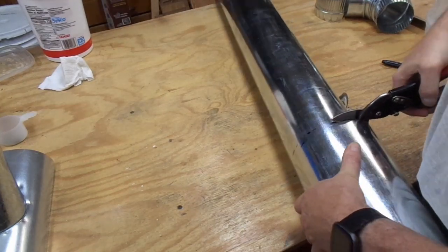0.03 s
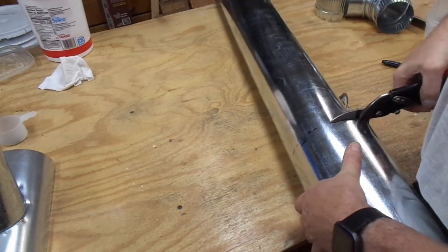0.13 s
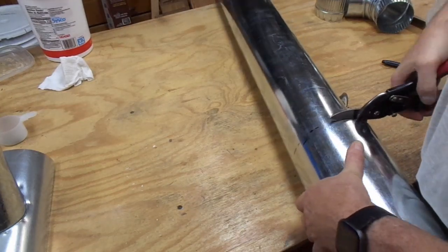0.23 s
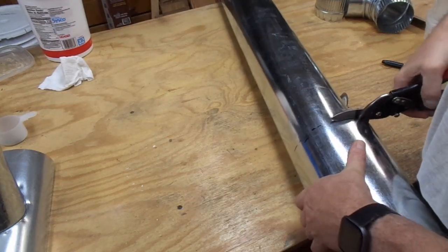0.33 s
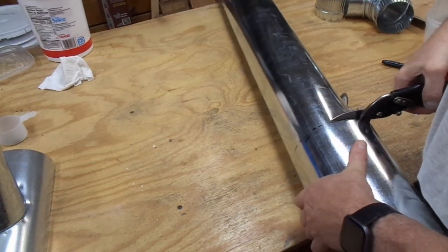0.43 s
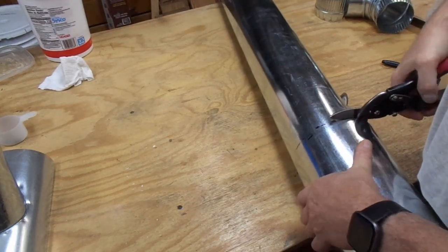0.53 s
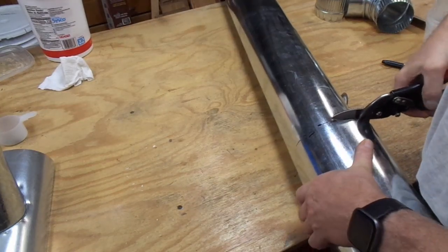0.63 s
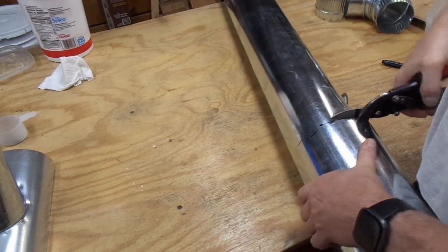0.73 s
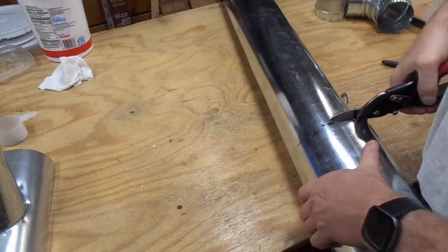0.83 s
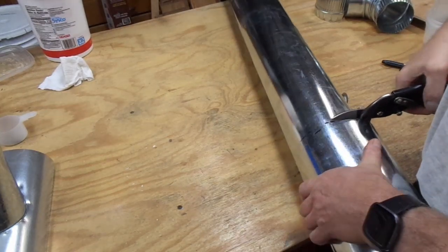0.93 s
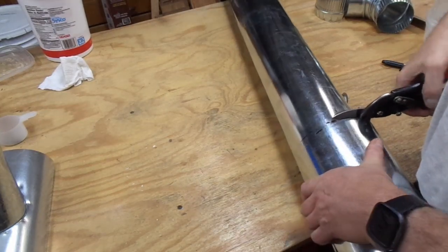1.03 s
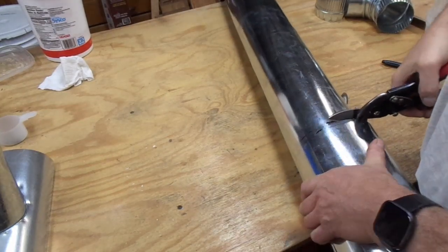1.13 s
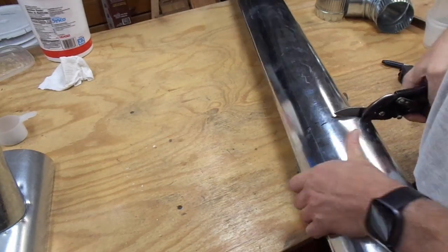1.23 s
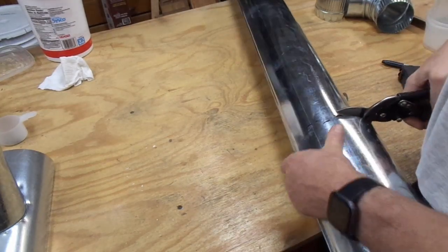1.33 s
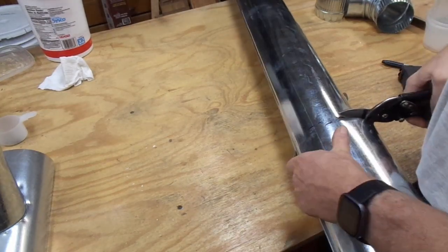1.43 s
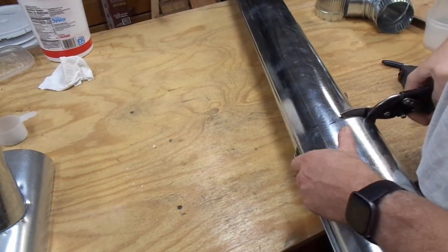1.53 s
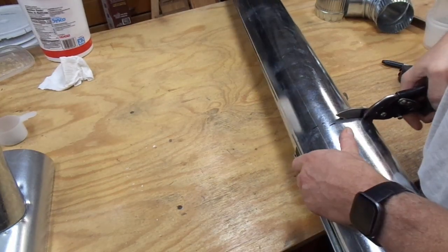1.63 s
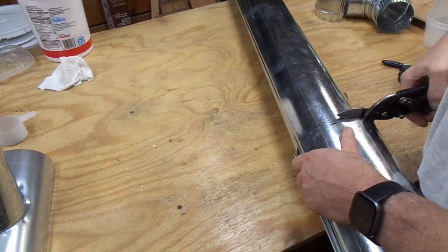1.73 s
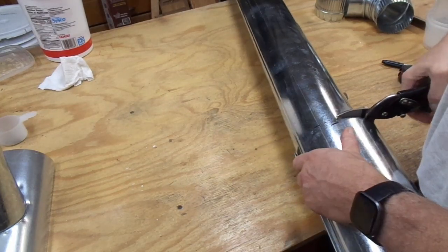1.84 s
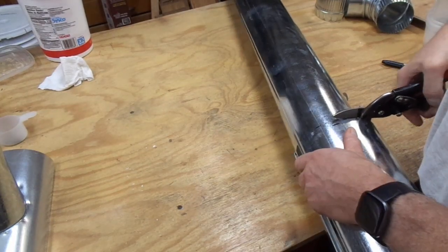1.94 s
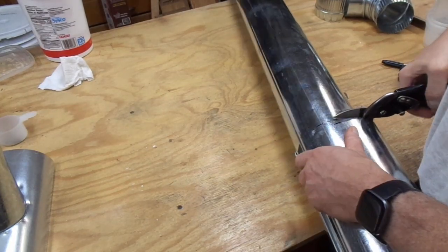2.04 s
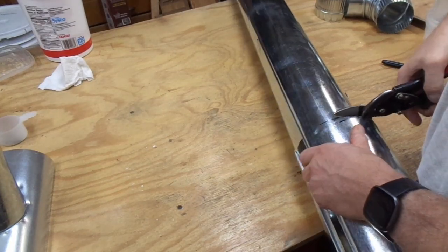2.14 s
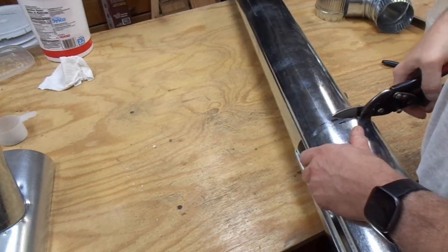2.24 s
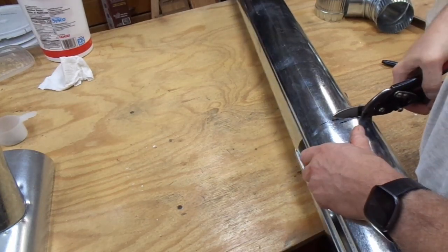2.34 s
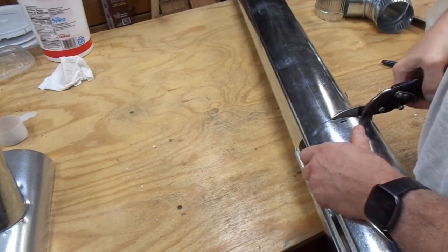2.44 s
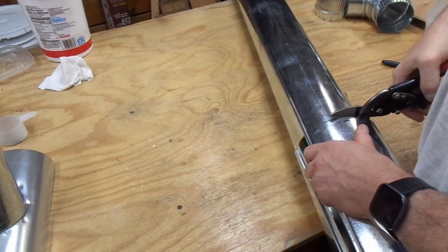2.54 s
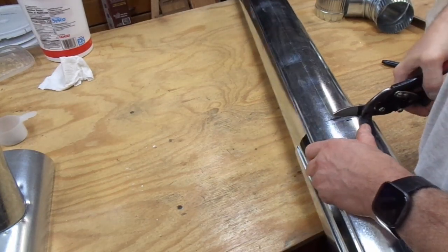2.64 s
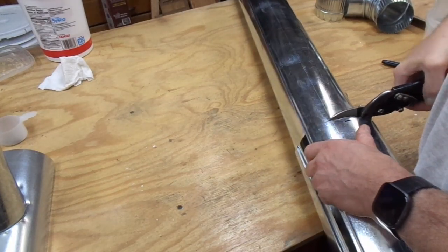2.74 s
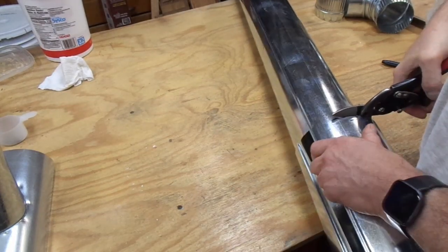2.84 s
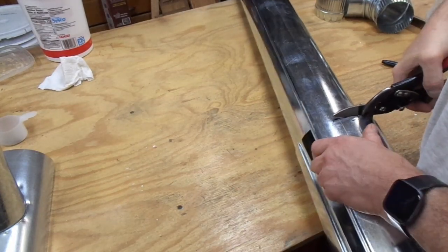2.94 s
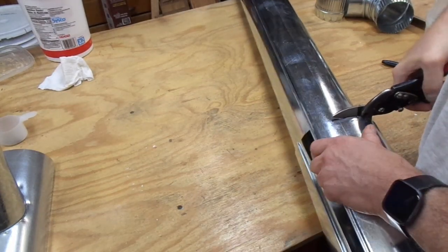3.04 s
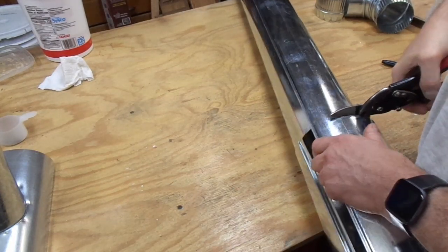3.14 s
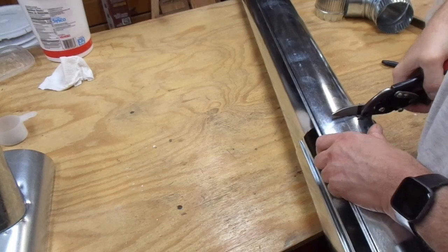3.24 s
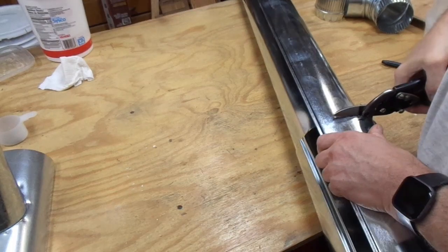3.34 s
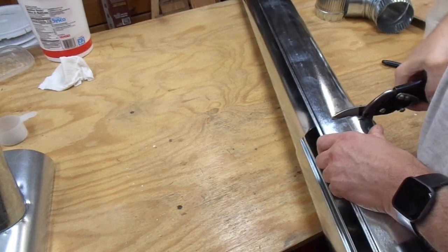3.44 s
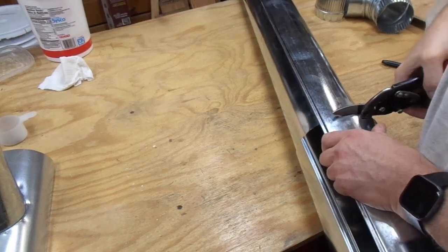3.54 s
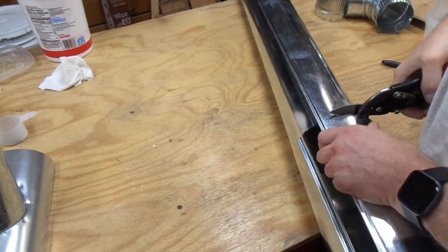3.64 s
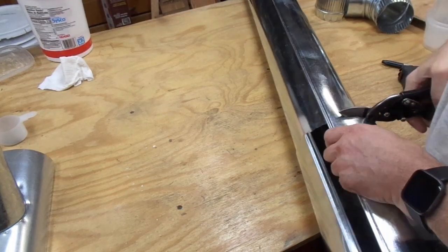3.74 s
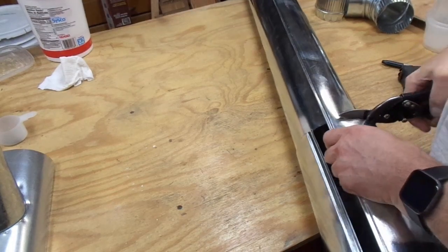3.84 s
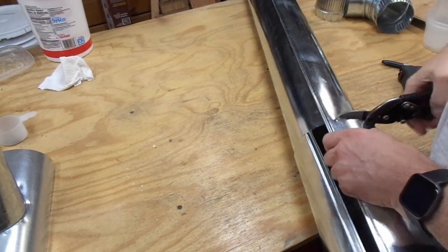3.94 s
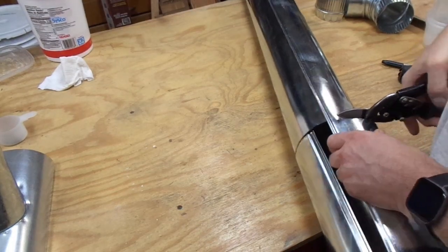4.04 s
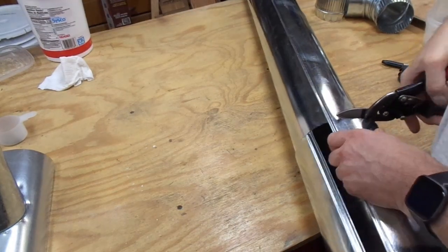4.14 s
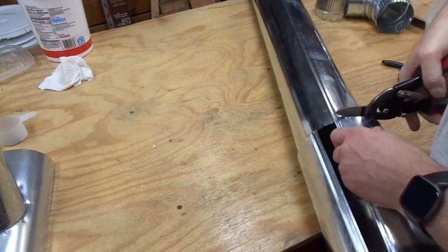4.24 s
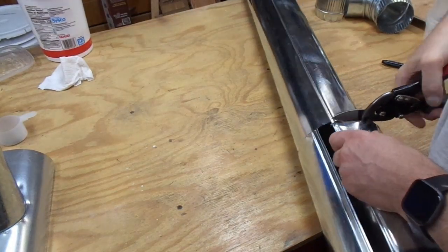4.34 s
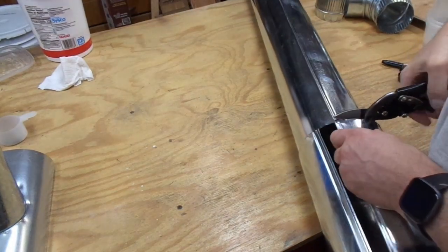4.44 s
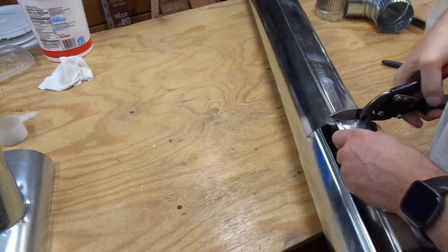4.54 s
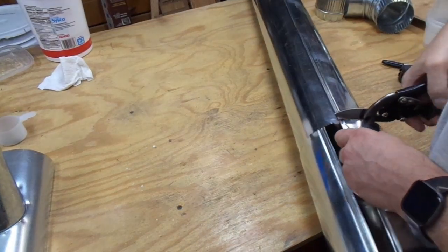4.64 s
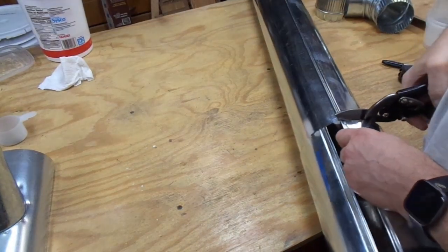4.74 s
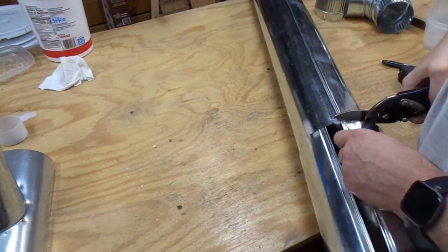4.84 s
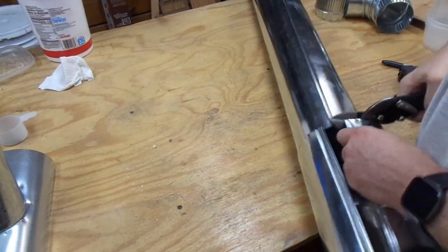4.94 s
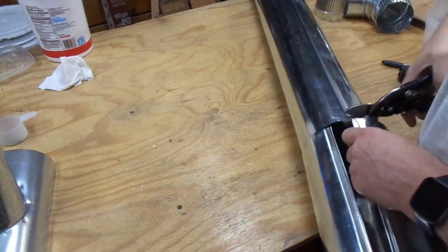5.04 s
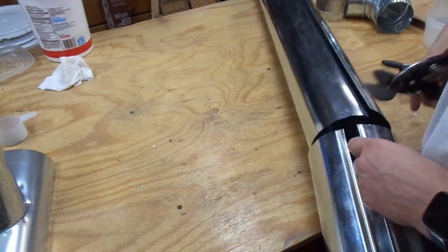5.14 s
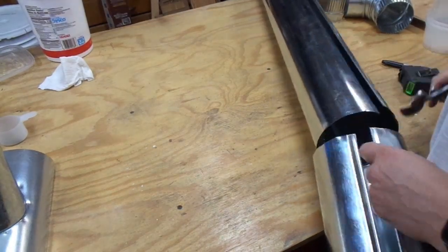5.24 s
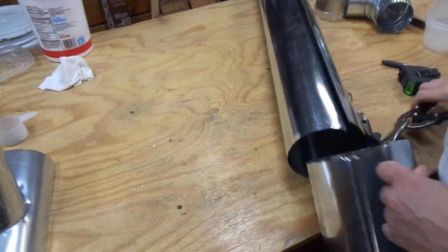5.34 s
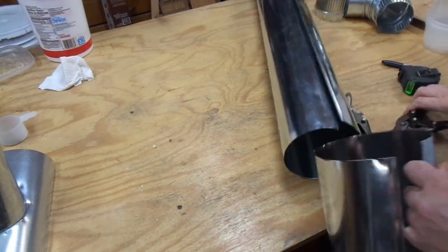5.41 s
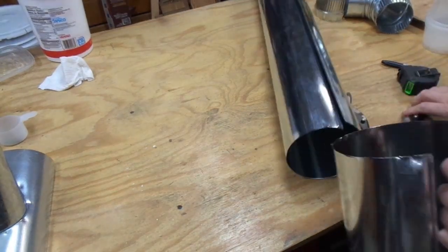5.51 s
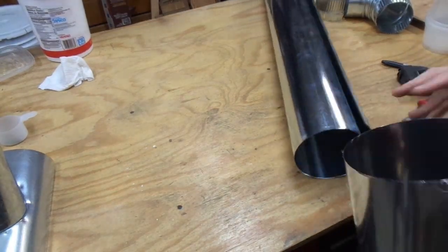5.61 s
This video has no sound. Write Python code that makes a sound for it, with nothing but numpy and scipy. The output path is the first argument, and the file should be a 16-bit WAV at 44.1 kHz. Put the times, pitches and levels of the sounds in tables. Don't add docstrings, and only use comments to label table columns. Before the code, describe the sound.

Close view of hand snips cutting a thin steel duct on a plywood bench. Crunchy bites and springy releases come in pairs, with blade rasp, small squeaks and soft thuds. Cuts grow louder after four seconds, then a distorted crack at five as the strip parts, followed by clanks and scraping of the freed piece. Small, fairly dry workshop with faint hiss.

```python
import sys
import numpy as np
from scipy import signal
from scipy.fft import rfft, irfft
from scipy.io import wavfile
from scipy.ndimage import uniform_filter1d

SR = 44100
rng = np.random.default_rng(int(sys.argv[2]) if len(sys.argv) > 2 else 0)


def voltage_ratio(decibels):
    exponent = np.asarray(decibels, float) / 20
    return 10 ** exponent


def wav_out(sig):
    wavfile.write(sys.argv[1], SR, np.round(np.clip(np.atleast_2d(sig).T, -1, 1) * 32767).astype(np.int16))


N = 250047
SPAN = 8192

# frequency in Hz, level in dB, T60 in s.
DUCT_AIR = [(277.5, -5, 0.17), (300, -8, 0.084)]
# frequency in Hz, level in dB, T60 in s.
WALL = [(375.4, 11, 0.19), (411.7, 10, 0.27), (449, 8, 0.18), (495, 7, 0.29), (615, -35.5, 0.14),
        (620, -0.5, 0.03), (662, 12.5, 0.2), (760, 4.5, 0.058), (824, -33, 0.13), (925, 7, 0.032),
        (975, -26, 0.18), (1080, -18, 0.3), (1160, 0.5, 0.026), (1214, 3, 0.15), (1383, -13, 0.69),
        (1520, -10, 0.21), (1594, 9.5, 0.028), (1670, -2.5, 0.28), (1810, 5, 0.043), (2000, -12, 0.068),
        (1890, -32, 0.089), (2184, -41.5, 0.04), (2533, -37.5, 0.04), (2600, -28, 0.054),
        (2740, 1.5, 0.076), (3090, -9, 0.26), (3370, -48.5, .1), (3420, -54, .12)]
# time in s, relative air level in dB.
AIR_SHARE = [(0, 2.5), (2.0, -4), (3.5, -8), (4.6, -4.5), (5.6, 6)]


def unit(x):
    return x / np.sqrt(np.mean(x ** 2) + 1e-20)


def band(x, low_hz, high_hz, order=2):
    sos = signal.butter(order, [low_hz, min(high_hz, .45 * SR)], "band", fs=SR, output="sos")
    return signal.sosfilt(sos, x)


def rings(modes):
    hz, db, t60 = np.transpose(modes)[:, :, None]
    t = np.arange(SPAN) / SR
    return voltage_ratio(db - 60 * t / t60) * np.sin(2 * np.pi * hz * t)


def sheet(low_hz, high_hz, t60, count=1):
    t = np.arange(SPAN) / SR
    decay = voltage_ratio(-60 * t / t60) + 2.6 * voltage_ratio(-60 * t / 0.0079)
    tail = band(rng.standard_normal((count, SPAN)), low_hz, high_hz) * decay
    return tail / np.sqrt(np.mean(tail ** 2, axis=1, keepdims=True))


def slips(times, spread_db):
    u = np.arange(SPAN // 2) / SR / times[:, None]
    sizes = voltage_ratio(spread_db * np.minimum(rng.exponential(1, u.shape), 6)) * rng.standard_normal(u.shape)
    clumps = voltage_ratio(1.5 * unit(band(rng.standard_normal(u.shape), 80, 400)))
    burst = sizes * clumps * np.exp(-(u - 3) ** 2 / 2)
    return burst / np.sqrt(np.sum(burst ** 2, axis=1, keepdims=True))


def add(out, s, burst, body, level_db):
    sound = signal.fftconvolve(burst, body)
    top = np.sqrt(np.max(uniform_filter1d(sound ** 2, size=440)) + 1e-20)
    piece = out[max(round(s * SR), 0):][:len(sound)]
    piece += voltage_ratio(level_db) / top * sound[:len(piece)]


def room_tone():
    # frequency in Hz, density in dB per Hz.
    tone_spectrum = [(35, -19), (65, -12.5), (100, -13.5), (170, -8.5), (280, -5.5), (700, -3), (1500, -9),
                     (3000, -14), (6000, -18.5), (12000, -18.5), (15300, -19.5)]
    hz, db = np.transpose(tone_spectrum)
    bins_hz = np.maximum(np.fft.rfftfreq(N, 1 / SR), 1)
    shape = voltage_ratio(np.interp(np.log(bins_hz), np.log(hz), db))
    return voltage_ratio(-53.5) * unit(irfft(rfft(rng.standard_normal(N)) * shape, N))


def workshop(x):
    echo_delay = np.zeros(round(0.012 * SR))
    tail = np.concatenate([echo_delay, sheet(120, 8500, 0.18)[0] / np.sqrt(SPAN)])
    return voltage_ratio(-24.5) * signal.fftconvolve(x, tail)[:N]


def hum():
    t = np.arange(N) / SR
    air_mode = rings([(DUCT_AIR[0][0], 0, 0.34)])[0]
    line = signal.fftconvolve(rng.standard_normal(N + SPAN), air_mode)[SPAN:SPAN + N]
    level_db = -59 + np.interp(t, *np.transpose(AIR_SHARE))
    return voltage_ratio(level_db) * unit(band(line, 220, 340))


def sliding():
    # time in s, low wall level in dB, upper wall level in dB.
    slide_levels = [
        (0.0, -86, -87),
        (1.61, -64, -56),
        (1.99, -62, -77),
        (2.54, -68, -81),
        (3.98, -56, -58),
        (4.06, -49.5, -72),
        (4.86, -60, -78),
        (5.2, -59, -53),
        (5.67, -71, -51),
    ]
    s, low_db, upper_db = np.transpose(slide_levels)
    t = np.arange(N) / SR
    lumps = voltage_ratio(5.8 * unit(band(rng.standard_normal(N), 10.5, 83)))
    rub = band(lumps * rng.standard_normal(N), 314, 6400, order=4)
    low_body = rings(WALL[:9]).sum(axis=0) + voltage_ratio(8.0) * rings(DUCT_AIR).sum(axis=0)
    upper_body = rings(WALL[9:]).sum(axis=0) + voltage_ratio(-9) * sheet(970, 4500, 0.12)[0]
    low = unit(signal.fftconvolve(rub, low_body)[:N])
    upper = unit(signal.fftconvolve(rub, upper_body)[:N])
    return voltage_ratio(np.interp(t, s, low_db)) * low + voltage_ratio(np.interp(t, s, upper_db)) * upper


def bench():
    # time in s, level in dB.
    thud_events = [(0.238, -58), (0.515, -76), (0.76, -73), (1.084, -62), (1.577, -60), (1.922, -78),
                   (2.145, -79), (2.493, -67), (2.825, -56), (3.167, -54), (3.502, -51), (4.042, -54),
                   (4.228, -54), (4.496, -54), (4.673, -58), (4.968, -48), (5.38, -42), (5.55, -46)]
    out = np.zeros(N)
    thud = rings([(100.7, -32, 0.26), (150, -24, 0.14)]).sum(axis=0)
    pushes = np.abs(slips(np.full(len(thud_events), .003), spread_db=2.5))
    for (s, level_db), push in zip(thud_events, pushes):
        add(out, s - .012, push, thud, level_db + 7.5)
    return signal.sosfilt(signal.butter(4, 68, "high", fs=SR, output="sos"), out)


def rumble(clanks):
    shake = np.sqrt(uniform_filter1d(clanks ** 2, size=660))
    return voltage_ratio(-33.5) * shake * unit(band(rng.standard_normal(N), 78, 118))


def pings():
    # time in s, level in dB, frequency in Hz, T60 in s.
    lone_pings = [
        (0.482, -54, 5360, .08),
        (0.003, -39.5, 328, 0.032),
        (3.163, -25.5, 540, 0.011),
        (3.865, -48.5, 4300, 0.017),
        (4.240, -39, 760, 0.091),
        (4.484, -38.5, 1933, 0.11),
        (4.609, -59, 4300, .04),
        (5.550, -20, 620, 0.015),
    ]
    out = np.zeros(N)
    bursts = slips(np.full(len(lone_pings), .0008), spread_db=-6.0)
    for (s, level_db, hz, t60), burst in zip(lone_pings, bursts):
        pair = [(hz, 0, t60), (1.06 * hz, -6, t60)]
        add(out, s, burst, rings(pair).sum(axis=0), level_db)
    return band(out, 300, 9000)


def blades(rasps):
    # frequency in Hz, level in dB, T60 in s.
    edge_modes = [(3447, 7, 0.1), (4710, 7, 0.054), (4770, 16, 0.029), (5800, 11, 0.06), (6520, -14, 0.028)]
    s, edge_db, hiss_db, time_s = np.transpose(rasps)
    time_s = np.clip(time_s, .0005, .014)
    edge, grip = rings(edge_modes), rng.normal(0, 6.9, (len(s), len(edge_modes)))
    middle = sheet(2320, 5530, 0.098, count=len(s))
    hiss = sheet(6200, 12400, 0.071, count=len(s))
    out = np.zeros(N)
    for k, burst in enumerate(slips(time_s, spread_db=3.0)):
        start = s[k] - 3.0 * time_s[k] - .0015
        edge_body = voltage_ratio(-8.5) * unit(voltage_ratio(grip[k]) @ edge) + middle[k]
        add(out, start, burst, edge_body, edge_db[k] - .3)
        add(out, start, burst, hiss[k], edge_db[k] + hiss_db[k] - .3)
    return out


def brightness(zone_hz):
    return -7 + 3.5 * np.log2(zone_hz / 700)


def strokes():
    # top in s, lower wall level in dB,
    # loudest wall zone in Hz, swell time in s, relative blade rasp in dB.
    crunches = [(.163, -37.5, 1120, 0.0058, -27), (.435, -38.5, 500, 0.0057, -15),
                (.714, -34.5, 1200, 0.013, -19.5), (.912, -42, 686, 0.0093, -14),
                (.98, -39.5, 1670, 0.0043, -19), (1.085, -35.5, 452, 0.0079, -17),
                (1.511, -35, 920, 0.016, -20), (1.838, -37, 623, 0.011, -24), (2.09, -32, 1480, 0.0063, -15.5),
                (2.413, -39.5, 1190, .004, -24), (2.444, -34.5, 1184, 0.012, -9.5),
                (2.728, -42.5, 1650, 0.0073, -24), (2.766, -37, 1740, 0.0098, -14),
                (3.091, -34, 1690, .008, -26), (3.169, -27, 443, 0.0051, -24),
                (3.227, -41.5, 1730, 0.012, -17), (3.426, -33, 780, 0.0064, -18.5),
                (3.898, -35.5, 1830, 0.0062, -20), (3.927, -30.5, 630, 0.01, -21),
                (4.207, -35, 780, 0.0026, -8.5), (4.243, -21.5, 920, 0.0031, -18.5),
                (4.419, -25.5, 1010, 0.0033, -24.5), (4.49, -36.5, 700, .0035, -25),
                (4.514, -29.5, 452, 0.01, -17.5)]
    releases = [(0.236, -33, 387, .0049, -18), (.527, -33.5, 400, 0.0092, -18.5),
                (.778, -33, 343, .012, -13.5), (1.607, -33.5, 513, 0.013, -15), (1.901, -36, 820, .01, -16),
                (2.161, -32, 474, .008, -8.5), (2.505, -31, 800, 0.0091, -11),
                (2.829, -30, 413, 0.0066, -17), (3.514, -32, 434, .013, -16),
                (3.986, -31.5, 662, 0.0065, -14.5), (4.058, -28.5, 980, .007, -16.5),
                (4.092, -29, 504, 0.0067, -24)]
    # top in s, lower wall level in dB, loudest
    # wall zone in Hz, # relative duct air in dB.
    shifts = [(.016, -50, 415, 2.5), (.061, -42, 650, -17), (0.179, -47, 406, -19), (0.45, -39, 420, -12),
              (0.486, -47.5, 667, 0), (.585, -54, 670, 0), (.658, -48, 1300, -10), (0.834, -49, 870, 3),
              (.935, -53, 726, 12), (3.026, -48, 2100, -15), (1.164, -50, 678, -7),
              (1.188, -41.5, 514, -17), (1.581, -36.5, 390, -6), (1.695, -48, 640, -26),
              (1.797, -49, 594, 0), (2.006, -49.5, 1593, -3), (2.05, -50, 2000, -15),
              (2.253, -51, 678, -22), (2.906, -59, 1701, 9), (3.589, -41.5, 408, -14),
              (3.675, -45, 1700, -7), (3.722, -47.5, 700, -4), (3.749, -44, 403, 4), (4.17, -56, 683, -10),
              (4.346, -44.5, 690, -2), (4.638, -42.5, 372, -16.5), (4.679, -55, 490, 11),
              (4.741, -45, 593, -5), (4.873, -44, 404, -10), (4.945, -43, 430, -19)]
    # top in s, edge level in dB,
    # relative hiss in dB, swell time in s.
    grazes = [(.065, -59, 0, 0.017), (.487, -52, -3, 0.0063), (1.178, -52, -7, 0.007),
              (1.585, -50, -4, .009), (1.636, -44, -6, 0.0086), (2.204, -47.5, -5, 0.0058),
              (2.253, -51.5, -3, 0.0027), (3.186, -41, -5, 0.0017), (3.222, -45.5, -4, 0.0011),
              (3.582, -47, -8, 0.016), (3.676, -51.5, -1.5, 0.016), (3.865, -55, 2.5, 0.00084),
              (4.025, -43.5, -12, 0.021), (4.157, -53.5, -2, 0.0041), (4.612, -55, -18, 0.0029),
              (4.851, -57, -7, 0.011), (4.971, 0, -5.5, 0.001), (4.984, -22, -9, 0.0052),
              (5.022, -36.5, -1, 0.0099), (5.104, -35.5, -4, 0.005), (5.132, -53, -3, 0.011),
              (5.164, -63, -2, 0.013), (5.317, -29, -6.5, 0.0075), (5.358, -26, -3.5, 0.0055),
              (5.378, -27, -1, 0.0074), (5.393, -25, -4.5, 0.0094), (5.454, -31.5, -4.5, 0.0034),
              (5.468, -39, 3, 0.0091), (5.49, -33.5, -5, 0.0089), (5.523, -33.5, -5, 0.0029)]

    rebounds = [(s + .027, db - 11, 574, .0095, rasp_db + 4) for s, db, _, _, rasp_db in releases]
    kinds = [(crunches, -2, 0.0047, -5), (releases, 0, 0, -4.5), (rebounds, 1, 0, -4.5)]
    wall, rasps = [], list(grazes)
    for rows, air_db, lag_s, hiss_db in kinds:
        for s, db, hz, swell_s, rasp_db in rows:
            air_now_db = air_db + np.interp(s, *np.transpose(AIR_SHARE))
            wall.append((s, db, air_now_db, hz, brightness(hz), swell_s))
            rasps.append((s + lag_s, db + rasp_db, hiss_db, swell_s))
    for s, db, hz, air_db in shifts:
        wall.append((s, db, air_db, hz, brightness(hz) + 0.5, 0.0095))
    return wall, rasps


def landings():
    # top in s, lower wall level in dB, loudest wall zone in Hz, swell time in s,
    # relative upper wall in dB.
    clank_events = [(4.972, -8.5, 1830, .0023, 2), (4.98, -8.5, 910, 0.0042, -6.5),
                    (4.99, -16, 442, 0.0081, 2), (5.023, -23, 1270, 0.012, 1),
                    (5.05, -25.5, 690, .0076, -7), (5.098, -27, 1320, 0.012, -2.5),
                    (5.163, -32, 753, 0.0099, -6.5), (5.242, -43.5, 660, .013, -18),
                    (5.312, -22, 776, .0046, -1.5), (5.332, -24, 820, 0.0078, -5),
                    (5.365, -13, 664, 0.0098, -4), (5.395, -17.5, 1120, 0.0082, -2),
                    (5.42, -19.5, 660, 0.0065, -16), (5.451, -24, 650, .012, -7),
                    (5.485, -29, 660, .011, -8), (5.519, -27, 1570, .012, -4.5),
                    (5.555, -22.5, 520, .0063, -27), (5.612, -41, 925, .015, -12),
                    (5.631, -38, 820, 0.009, -7)]
    air_db = -14
    return [(s, db, air_db, hz, upper_db, swell_s) for s, db, hz, swell_s, upper_db in clank_events]


def duct(events, damping, sheet_db, zone_db, spread_db):
    s, wall_db, air_db, zone_hz, upper_db, time_s = np.transpose(events)
    time_s = np.clip(time_s, .001, .014)
    t = np.arange(SPAN) / SR
    wall, air = rings(WALL) * voltage_ratio(-damping * t), rings(DUCT_AIR)
    hz = np.array(WALL)[:, 0]
    grip = rng.normal(0, 3.5, (len(s), len(hz) + len(air)))
    low = hz < 1150
    low_sheet = sheet(357, 1198, 0.16, count=len(s))
    high_sheet = sheet(1070, 3170, 0.16, count=len(s))
    out = np.zeros(N)
    for k, burst in enumerate(slips(time_s, spread_db)):
        nearness = np.exp(-(np.log2(hz / zone_hz[k]) / 0.22) ** 2)
        strength = voltage_ratio(grip[k, :len(hz)] + zone_db * nearness)
        start = s[k] - 3.0 * time_s[k] - .003
        lower = unit(strength * low @ wall) + voltage_ratio(sheet_db) * low_sheet[k]
        upper = unit(strength * ~low @ wall) + voltage_ratio(sheet_db) * high_sheet[k]
        add(out, start, burst, lower, wall_db[k] - .3)
        add(out, start, burst, upper, wall_db[k] + upper_db[k] - .3)
        add(out, start, burst, voltage_ratio(grip[k, len(hz):]) @ air, wall_db[k] + air_db[k] - .3)
    return signal.sosfilt(signal.butter(8, 242, "high", fs=SR, output="sos"), out)


def scene():
    wall, rasps = strokes()
    cutting = duct(wall, damping=420, sheet_db=-1.0, zone_db=14.0, spread_db=3.0)
    clanks = duct(landings(), damping=76, sheet_db=3, zone_db=20.0, spread_db=2.5)
    snap_s = 4.9677
    before = snap_s - np.arange(N) / SR
    strain = np.where((before > 0) & (before < .012), voltage_ratio(-14), 1)
    near = cutting + strain * (clanks + blades(rasps)) + pings() + bench() + rumble(clanks)
    return (near + workshop(near) + sliding() + room_tone() + hum())[None]


def band_limit(x):
    return signal.sosfilt(signal.butter(12, 16470, fs=SR, output="sos"), x)


def record(dry):
    overload = .67
    cut = signal.sosfilt(signal.ellip(10, .5, 70, 15150, fs=SR, output="sos"), dry)
    flat = cut / (1 + np.abs(cut / overload) ** 6) ** (1 / 6)
    mix = signal.sosfiltfilt(signal.cheby2(10, 35, 16600, fs=SR, output="sos"), flat)
    return band_limit(mix)


dry = scene()
out = record(dry)
wav_out(out)
```